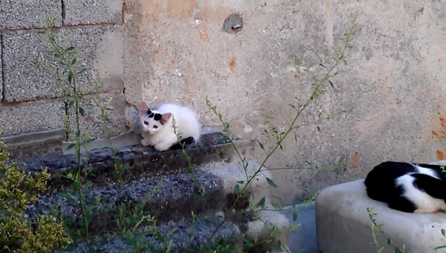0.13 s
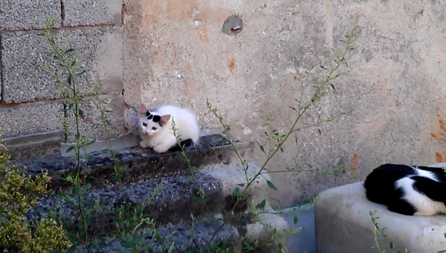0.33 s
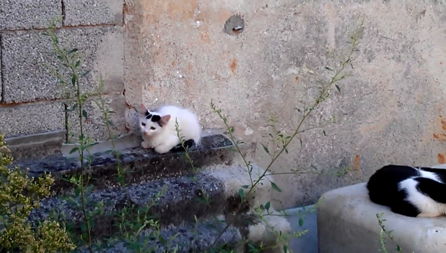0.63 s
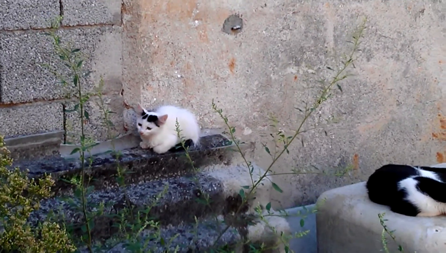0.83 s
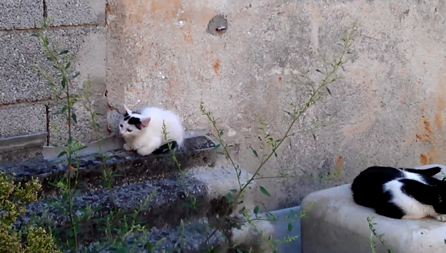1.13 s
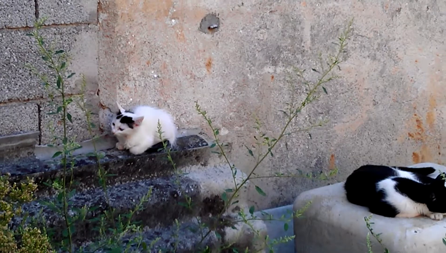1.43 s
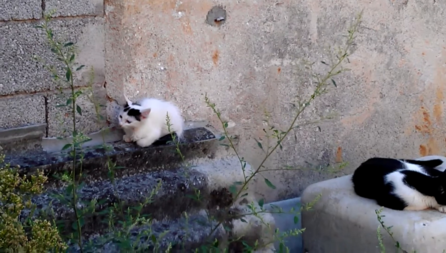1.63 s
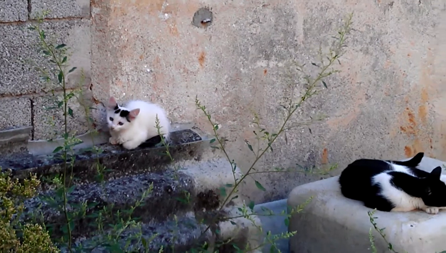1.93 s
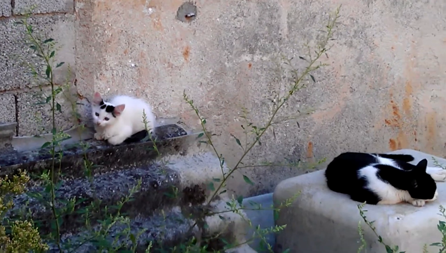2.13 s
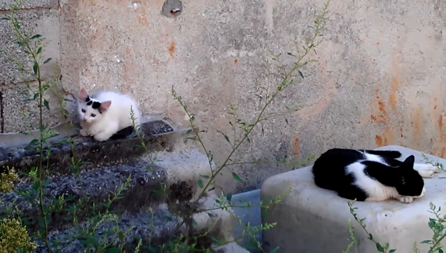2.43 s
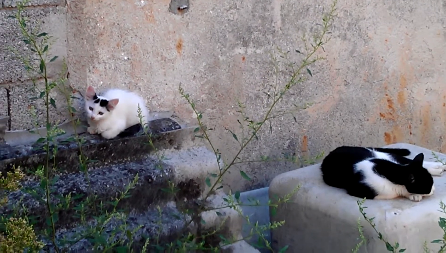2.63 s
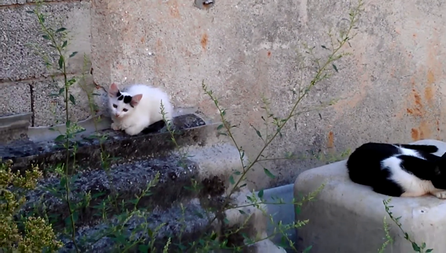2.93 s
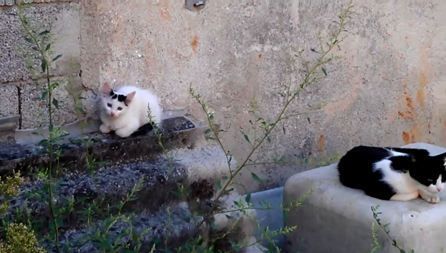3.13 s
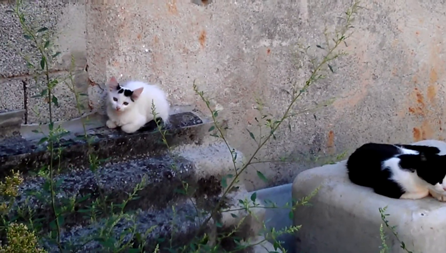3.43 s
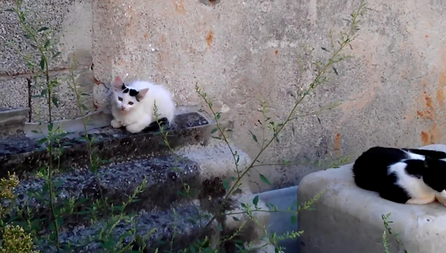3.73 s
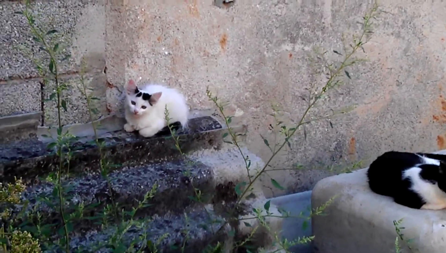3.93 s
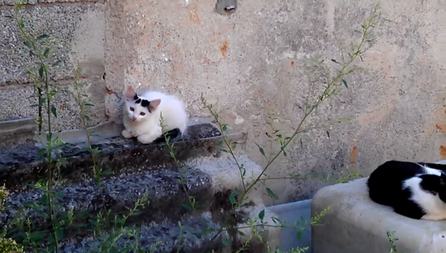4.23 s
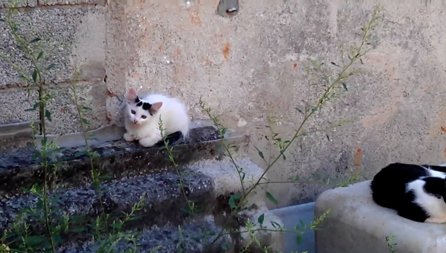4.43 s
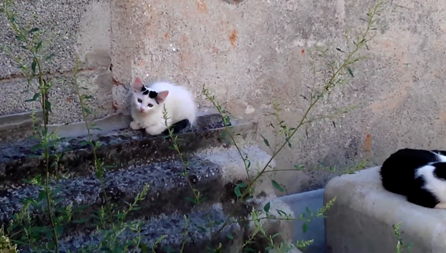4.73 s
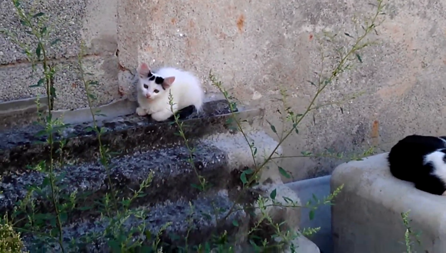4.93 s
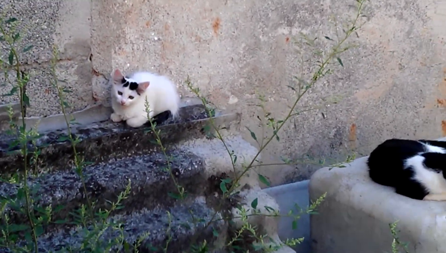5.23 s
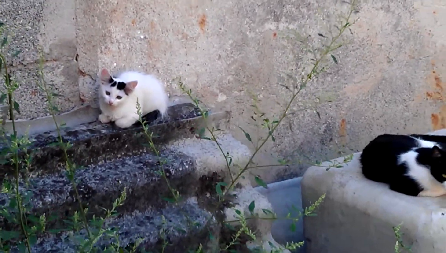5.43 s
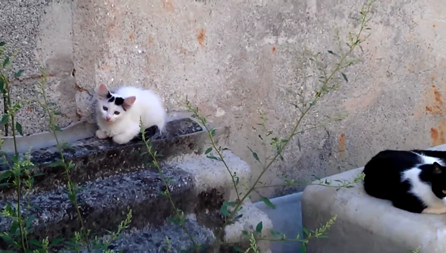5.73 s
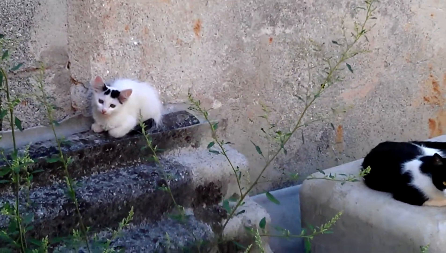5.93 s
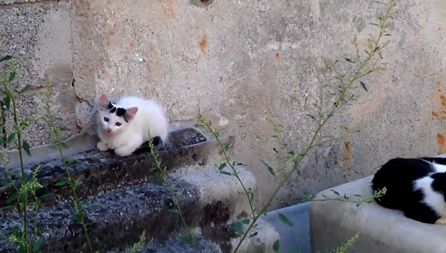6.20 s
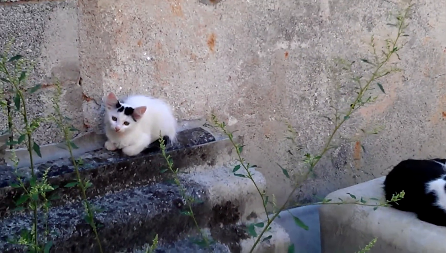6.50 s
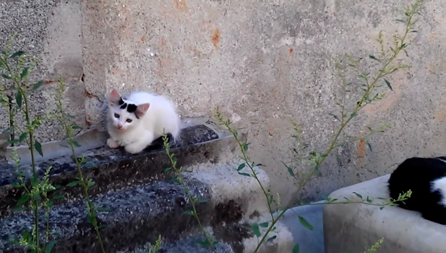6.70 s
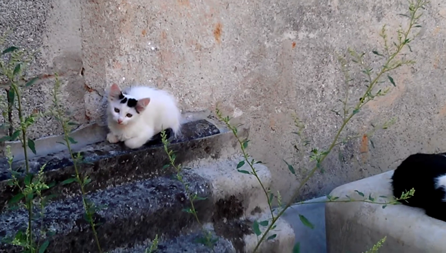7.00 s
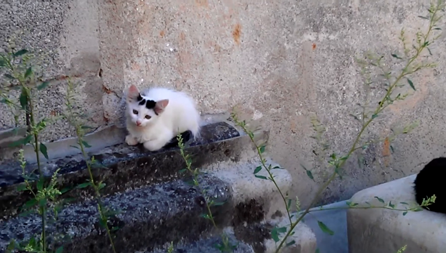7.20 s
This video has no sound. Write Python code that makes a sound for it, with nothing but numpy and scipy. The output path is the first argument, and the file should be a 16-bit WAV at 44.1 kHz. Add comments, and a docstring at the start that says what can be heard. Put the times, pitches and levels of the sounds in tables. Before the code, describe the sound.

Throughout, a distant four-cylinder engine runs at steady speed, about eleven uneven cycles a second, with low ringing exhaust beats, blurred mechanical clatter reflected by yard walls, and a thin wavering fan tone near 1.2 kHz. Until about 2 s it booms deeply; by 5.5 s it has become drier and more rattly, growing slightly louder toward the end. Faint brushing starts near 2.5 s, then at 2.9 s a loud burst of soft hollow slaps and clicks hits the camera body, with rough, partly singing rubbing fading by 3.5 s. A much lighter brush comes at 4.5-4.9 s. Faint clicks occur around 5.35 s, two sharper ones at 5.7 s, and one very loud dry snap at 6.56 s. From 7.13 s a brief grainy finger scrape mixes with a flurry of plastic clicks, the last around 7.3 s.

```python
"""Far engine in a yard, close handling

A four-cylinder engine some way off: ringing exhaust beats, clatter carried between yard walls, a faint fan tone.
Close to the microphones, soft material slaps the camera body and brushes hard across it, then again
more lightly: shaped friction noise, short rings and narrow-band rubs.
The grip shifts: resonant clicks on the plastic case, faint slides, and a brief finger scrape in noise."""
import sys
import numpy as np
from scipy.fft import rfft, irfft, next_fast_len
from scipy.io import wavfile
from scipy.ndimage import map_coordinates

SR = 44100
rng = np.random.default_rng(int(sys.argv[2]) if len(sys.argv) > 2 else 0)


def put_to_file(sound):
    """Save the sound as 16-bit audio at rate SR, in the file named by the first command-line argument."""
    columns = np.atleast_2d(sound).T  # one column per channel
    safe = np.clip(columns, -1, 1)
    whole_steps = np.round(safe * 32767)
    wavfile.write(sys.argv[1], SR, whole_steps.astype(np.int16))


N = 324576
TIME = np.arange(N) / SR  # s


def amp(db):
    """Decibels to gain."""
    return 10 ** (np.asarray(db) / 20)


def unit(x):
    """Scale to rms 1."""
    return x / np.sqrt(np.mean(x ** 2) + 1e-20)


def along(points, hz):
    """Read (frequency, value) points on a log frequency axis."""
    f, v = np.transpose(points)
    return np.interp(np.log(hz + 1), np.log(f + 1), v)


def shape(points):
    """A (frequency [Hz], level [dB]) spectrum as a response."""
    return lambda hz: amp(along(points, hz))


def wobble(rate):
    """A smooth random curve through rate knots a second."""
    knots = rng.standard_normal(int(N * rate / SR) + 4)
    return map_coordinates(knots, [TIME * rate])


def filtered(x, response):
    """Multiply the spectrum of x by a response of frequency."""
    n = x.shape[-1]
    padded = next_fast_len(n + 8192)
    spectrum = rfft(x, padded) * response(np.fft.rfftfreq(padded, 1 / SR))
    return irfft(spectrum, padded)[..., :n]


def resonances(modes, f, alternate=True):
    """Causal response of (Hz, width Hz, dB) modes; with like signs they leave notches between them."""
    total = 0
    for k, (centre, width, db) in enumerate(modes):
        sign = (-1) ** (k * alternate)
        damping = 1j * f * width
        total = total + sign * amp(db) * damping / (centre * centre - f * f + damping)
    return total


def placed(pair, colour, side, pan):
    """Colour two unrelated signals as mid and side, spread them over the two microphones, at rms 1."""
    def mid_side(hz):
        ratio = amp(along(side, hz))
        return colour(hz) * np.array([np.ones_like(hz), ratio]) / np.hypot(1, ratio)

    mid, sides = filtered(pair, mid_side)
    left_right = np.array([mid + sides, mid - sides])
    return unit(filtered(left_right, lambda hz: amp(np.outer([.5, -.5], along(pan, hz)))))


def friction(rate, grain_db):
    """Smooth sliding hiss with tiny slips of uneven size, rate a second."""
    slips = (rng.random(N) < rate / SR) * rng.standard_normal((2, N))
    return rng.standard_normal((2, N)) + amp(grain_db) * unit(slips)


# Far exhaust, the beats of one cycle: (place in cycle [0-1], ring pitch [Hz], mean swell [s],
# mean level while booming [dB], mean level once rattling [dB])
EXHAUST_BEATS = [(-.105, 166.4, 0.00944, -40.5, -66), (-.075, 198, 0.00394, -51, -40.5),
                 (.061, 303.5, 0.00654, -59, -49), (.199, 167.5, 0.0097, -47, -75),
                 (.429, 319.4, 0.003, -54, -51), (.582, 301.1, 0.0061, -51, -50.5),
                 (.625, 191.9, 0.0048, -52, -51), (.787, 264.7, 0.00288, -69.5, -41.5)]
# Clean engine orders: (multiple of the cycle rate, level while booming [dB], level once rattling [dB])
ENGINE_ORDERS = [(8, -80.5, -71), (12, -57.5, -63.5), (13, -65.5, -62.5), (16, -52.5, -80),
                 (19, -69.5, -66.5), (23, -71.5, -59), (27, -69.5, -61.5), (29, -60, -67.5),
                 (50.5, -69, -89), (67.62, -86, -68), (71.8, -65, -79), (98.9, -81, -61.5),
                 (117, -78.5, -60.5)]
# The boom's level dips for a moment: (time [s], level [dB])
BOOM_LEVEL = [(0, 3), (.35, 0.5), (1.1, 0), (1.45, 0), (1.75, -2), (2.1, 0.5)]
RATTLE_DB = -2  # the drier voice at full strength
CHANGE_START_S, CHANGE_S = 2.02, 3.5  # the boom gives way to the rattle
LENGTH_SCATTER, PITCH_SCATTER = 0.163, 0.006  # no two beats ring alike (log length, share of pitch)


def exhaust(cycles):
    """Uneven firings ring the pipe and the yard; the deep boom gives way to a drier rattle."""
    change = np.pi / 2 * np.clip((TIME - CHANGE_START_S) / CHANGE_S, 0, 1)
    boom = amp(np.interp(TIME, *np.transpose(BOOM_LEVEL))) * np.cos(change)
    rattle = amp(RATTLE_DB) * np.sin(change)
    count = np.arange(-1, int(cycles[-1]) + 1)
    t = np.arange(SR // 5) / SR
    out = np.zeros(N + SR)
    for place, hz, swell, boom_db, rattle_db in EXHAUST_BEATS:
        starts = np.interp(count + place, cycles, TIME, -1, -1)
        for s, (size, jitter, length, detune) in zip(starts, rng.standard_normal((len(count), 4))):
            if s > 0:
                age = t / (swell * np.exp(LENGTH_SCATTER * length))
                ring = age * np.exp(1 - age) * np.sin(2 * np.pi * hz * (1 + PITCH_SCATTER * detune) * t)
                i = int(np.clip((s + 0.000157 * jitter) * SR, 0, N - 1))
                level = boom[i] * amp(boom_db) + rattle[i] * amp(rattle_db)
                out[i:i + len(t)] += amp(0.93 * size) * level * ring
    beats = filtered(out[:N], lambda hz: 1 / np.sqrt(1 + (124 / (hz + 1)) ** 20))  # low cut

    angle = 2 * np.pi * (cycles - EXHAUST_BEATS[0][0])  # the hum keeps step with the first listed beat
    hum = np.zeros(N)
    for k, boom_db, rattle_db in ENGINE_ORDERS:
        level = boom * amp(boom_db) + rattle * amp(rattle_db)
        hum += level * amp(1.62 * wobble(5.0)) * np.sin(round(k) * angle)  # whole orders only
    return (beats + hum) * amp([[.4], [-.4]])


# Airborne engine noise across the yard: (frequency [Hz], level [dB])
CLATTER_COLOUR = [(260, -30.5), (450, -9.5), (620, -3.5), (800, 1), (980, 0), (1250, 1.5), (2000, -2.5),
                  (2600, -2), (3000, -9), (4000, -6.5), (5200, -14.5), (8000, -16), (9200, -22),
                  (13000, -20)]
# The engine's covers: (resonance [Hz], width [Hz], level [dB])
COVER_MODES = [(782.9, 24.6, -6), (1087.6, 35, -6.5), (1167, 23.2, -6.5), (1310.3, 40, -6.5),
               (1781.8, 16.5, -2.5), (2613, 87, -5.5)]
# Low engine rumble: (frequency [Hz], level [dB])
RUMBLE_COLOUR = [(20, -16), (55, -19), (108, -23), (140, -2), (220, -1.5), (330, 4.5), (430, -0.5),
                 (520, -6.5), (800, -21), (1500, -56)]
# Spread of sound between the yard walls: (frequency [Hz], side minus mid [dB])
YARD_SPREAD = [(60, -3), (120, 7), (230, -9), (460, 4), (920, 5), (1810, 1), (3580, -0.5), (7070, 0),
               (14000, -4)]
# The two microphones differ in colour: (frequency [Hz], left minus right [dB])
MICROPHONE_BALANCE = [(60, 1), (120, 12), (230, -3), (460, 1), (920, 1), (1810, 1.5), (3580, -1),
                      (7070, -7), (14000, 10.5)]
FIRINGS = 4  # per cycle
CLATTER_DB, RISE_START_S, RISE_DB_PER_S = -44.5, 3.54, 0.78  # common gain holds, then slowly grows


def clatter(cycles):
    """Mechanical noise blurred by distance: part repeats every cycle, part rings the covers."""
    pattern = rng.standard_normal((2, SR // 11))
    repeated = pattern[:, (cycles % 1 * pattern.shape[1]).astype(int)]

    def drive(repeat_db):
        return rng.standard_normal((2, N)) + amp(repeat_db) * repeated

    throb = amp(.5 * np.cos(2 * np.pi * cycles * FIRINGS) + 0.78 * wobble(7))
    wash = placed(drive(repeat_db=-7.5), shape(CLATTER_COLOUR), YARD_SPREAD, MICROPHONE_BALANCE)
    covers = placed(drive(repeat_db=-3.0), lambda hz: resonances(COVER_MODES, hz),
                    [(1000, 0.053)], MICROPHONE_BALANCE)
    rumble = placed(drive(repeat_db=-0.5), shape(RUMBLE_COLOUR), YARD_SPREAD, MICROPHONE_BALANCE)
    level_db = CLATTER_DB + RISE_DB_PER_S * np.maximum(TIME - RISE_START_S, 0)
    throbbing = throb * (amp(0.6243) * wash + amp(-10.0 + 2.02 * wobble(3.058)) * covers)
    return amp(level_db) * (throbbing + amp(-10.0) * rumble)


# The far fan's tone dips a little, then rises: (time [s], mean pitch [Hz], mean level [dB])
FAN_TONE = [(0, 1167, -57.5), (2, 1160, -60), (4.1, 1173, -56), (5.5, 1192, -56.5), (7.3, 1192, -55.5)]
WHINE_WAVER_HZ, WHINE_FLICKER_DB = 5, 3  # scales of the random curves


def whine():
    """A thin wavering fan tone that flickers on its way across the yard."""
    s, hz, db = np.transpose(FAN_TONE)
    pitch = np.interp(TIME, s, hz) + WHINE_WAVER_HZ * (wobble(3) + wobble(30))
    level = amp(np.interp(TIME, s, db) + WHINE_FLICKER_DB * wobble(12))
    return level * np.sin(2 * np.pi * np.cumsum(pitch) / SR) * amp([[.5], [-.5]])


HISS_DB = -60


def hiss():
    """Steady, faint top-end noise of the microphones themselves."""
    colour = shape([(4000, -20.5), (8000, -6.5), (9500, 1.5), (13000, -2)])
    return amp(HISS_DB) * placed(rng.standard_normal((2, N)), colour, YARD_SPREAD, MICROPHONE_BALANCE)


def surge(crest, rise, fall):
    """A rounded crest of height 1 between an exponential rise and fall."""
    t = TIME - crest
    return np.exp(1 - np.hypot(1, t / np.where(t < 0, rise, fall)))


# Pushes against the camera body: (crest time [s], drag level [dB], rise [s], fall [s],
# body over drag [dB], bristle over drag [dB])
BRUSH_PUSHES = [(2.56, -42, 0.058, 0.111, -11.5, -6.5), (2.737, -50.5, .025, 0.0217, -11.5, 9),
                (2.822, -37.5, 0.0093, 0.058, -3.5, 2.5), (2.914, -9, 0.013, 0.019, -16.5, -11),
                (2.942, -18.5, 0.0042, 0.0179, -20, 8.5), (3.053, -19.5, 0.0614, 0.0423, -12, 3.5),
                (3.23, -30, 0.17, 0.1087, -7.5, 1.5), (3.278, -33, 0.031, 0.0405, -17, -7.5),
                (4.53, -33, 0.0485, 0.0632, -3.5, 2), (4.705, -36.5, 0.062, 0.0894, -5.5, 0),
                (4.8, -40, 0.0147, 0.055, 5.5, -11)]
# Hollow body under the brushing: (frequency [Hz], level [dB])
BODY_COLOUR = [(30, -43.5), (100, -30.5), (150, -13), (195, 4), (260, -9.5), (365, 2.5), (450, -4.5),
               (600, -13), (1000, -60)]
# Dragging material: (frequency [Hz], level [dB])
DRAG_COLOUR = [(100, -80), (400, -16.5), (560, -19.5), (680, -5.5), (800, 0), (1150, -2), (1550, -4),
               (2200, -10.5), (2900, -39), (6000, -60)]
# Bristling top of the brushing: (frequency [Hz], level [dB])
BRISTLE_COLOUR = [(150, -69), (800, -14.5), (1600, -0.5), (2350, 0), (2900, -9), (4100, -2.5),
                  (5200, -12.5), (6700, -16.5), (8100, -13.5), (9200, -27.5), (12000, -28), (14000, -73)]
# Spread at close range: (frequency [Hz], side minus mid [dB])
BRUSH_SPREAD = [(60, 7.5), (150, -30), (370, 0.5), (920, -1.5), (2270, -4.5), (5630, -2), (14000, 0)]
# Balance over the microphones: (frequency [Hz], left minus right [dB])
BRUSH_BALANCE = [(60, 10), (150, 1), (370, 0.5), (920, 2.5), (2270, -1.5), (5630, -7), (14000, -3)]


def brushing():
    """Soft material drags over the case in overlapping pushes, each with its own share of body and bristle."""
    power = np.zeros((3, N))
    for s, db, rise, fall, body_db, bristle_db in BRUSH_PUSHES:
        gains = amp(db + np.array([body_db, 0, bristle_db]))
        power += np.outer(gains, surge(s, rise, fall)) ** 2
    catch = unit(amp(0.73 * wobble(170) + 0.35 * wobble(21.797)))  # the contact catches and lets go
    out = np.zeros((2, N))
    for gain, colour in zip(np.sqrt(power), (BODY_COLOUR, DRAG_COLOUR, BRISTLE_COLOUR)):
        rub = friction(rate=900, grain_db=-4.5)
        out += gain * placed(rub, shape(colour), BRUSH_SPREAD, BRUSH_BALANCE)
    return catch * out


# The grip slides faintly, close by: (crest time [s], level [dB], Gaussian length [s])
GRIP_SLIDES = [(2.724, -47, 0.11), (4.539, -43, 0.101), (4.771, -46.5, 0.0484), (4.868, -42.5, 0.027),
               (4.974, -44, 0.056), (5.2, -45.5, 0.026), (6.8, -43, 0.031)]
# Scraping skin: (frequency [Hz], level [dB])
SKIN_COLOUR = [(1180, -45.5), (2000, -26), (2510, -12), (4060, -4.5), (4410, 3), (5230, -11), (7980, -7.5),
               (9240, -15.5), (12000, -7.5), (14000, -19.5)]
SCRAPE_S, SCRAPE_DB = 7.134, -29.5  # start and gain of the scrape
SCRAPE_ATTACK_S, SCRAPE_HOLD_S, SCRAPE_RELEASE_S = 0.0263, 0.0367, 0.053


def finger():
    """Skin slides faintly on the case and once scrapes across it, as grainy friction noise."""
    faint = sum(amp(db) * np.exp(-.5 * ((TIME - s) / length) ** 2) for s, db, length in GRIP_SLIDES)
    slide_colour = shape([(1500, -15), (4200, 2.5), (6000, -7), (8000, 2.5), (9500, -4.5), (13000, -3.5)])
    slide = placed(friction(rate=310, grain_db=-6), slide_colour, [(1000, -2.2)], [(1000, 0)])
    rough = friction(rate=3500, grain_db=-3) * amp(1.62 * wobble(250))
    scrape = placed(rough, shape(SKIN_COLOUR), [(1000, -3.0)], [(4000, -1.5), (14000, 1)])
    corners = SCRAPE_S + np.cumsum([0, SCRAPE_ATTACK_S, SCRAPE_HOLD_S, SCRAPE_RELEASE_S])
    press = np.interp(TIME, corners, [0, 1, 1, 0])
    return faint * slide + amp(SCRAPE_DB) * press * scrape


# Soft material slaps the case: (start time [s], level [dB], ring pitch [Hz])
SLAPS = [(2.9074, -1.5, 1200), (2.912, -6.5, 1100), (2.9165, -6.5, 1142), (2.9234, -6.5, 1195),
         (2.9305, -3.5, 1030), (2.9391, -8, 1018)]
THUMP_SWELL_S = 0.001146


def thumps():
    """A quick run of soft, hollow slaps: short swelling rings, nearly alike at both microphones."""
    out = np.zeros((2, N + SR))
    t = np.arange(SR // 20) / SR
    age = t / THUMP_SWELL_S
    for s, db, hz in SLAPS:
        ring = np.sin(2 * np.pi * hz * (t + np.array([[.00007], [0]])))  # one microphone is nearer
        out[:, round(s * SR):][:, :len(t)] += amp(db) * age * np.exp(1 - age) * ring
    return out[:, :N] * amp([[.6], [-.6]])


# Snaps at the grip: (start time [s], level [dB], left minus right [dB], colour centre [Hz],
# colour width [octaves], scuff level against the click [dB], scuff fall by 60 dB [s])
CASE_CLICKS = [(2.9364, -9.5, -4, 4200, 0.49, -21.5, 0.054), (2.9418, -14, -5.5, 4100, 0.41, -23, .05),
               (5.3499, -27.5, 0, 1410, 0.76, -14.5, 0.104), (5.3687, -25.5, -5.5, 1500, 0.86, -15, 0.18),
               (5.374, -33, -2, 6300, 0.76, -17, .02), (5.4025, -33.5, -5, 1500, 0.95, -9.5, 0.079),
               (5.7136, -11, 4.5, 13000, 0.85, -12.5, 0.0375), (5.7188, -10.5, -3, 8600, 1.5, -20.5, 0.158),
               (5.771, -32.5, 1, 5000, 0.5, -8, 0.175), (5.925, -30.5, 0, 4500, 0.73, -20, .03),
               (6.5615, 1, -5, 4830, 0.813, -33, 0.027), (6.5616, -36.5, -1, 307, 0.293, -16, 0.033),
               (7.129, -29.5, -2, 4800, .9, -5, 0.046), (7.16, -21.5, 0, 4500, 1, -17.5, 0.021),
               (7.1757, -13.5, 6, 10900, 0.95, -21.5, .02), (7.1849, -19, -3.5, 4500, 0.66, -16, .02),
               (7.2012, -22.5, 1, 4600, 0.29, -17, .02), (7.2117, -14, 0, 4330, 0.51, -23, 0.022),
               (7.2302, -26.5, -1, 4600, 0.31, -11.5, .025), (7.3224, -13.5, 1, 2500, 1.78, -15.5, 0.096)]
# The plastic case: (resonance [Hz], width [Hz], level [dB])
CASE_MODES = [(2083, 343, 7.5), (3777, 810, 0.5), (4856, 272, -2.5), (6250, 790, -19.5), (7990, 490, 5),
              (9730, 550, -12.5)]
# Its dull, unpitched response: (frequency [Hz], level [dB])
SHELL_COLOUR = [(40, -65), (100, -35.5), (350, -6), (1250, -5), (2800, -25), (6300, -16), (13000, -10)]


def clicks():
    """Each snap rings the case for a few milliseconds and trails a short scuff."""
    out = np.zeros((2, N + SR))
    size = 8192
    t, hz = np.arange(size) / SR, np.fft.rfftfreq(size, 1 / SR)
    case = abs(resonances(CASE_MODES, hz, alternate=False)) + amp(along(SHELL_COLOUR, hz))
    for s, db, pan_db, centre_hz, octaves, scuff_db, t60 in CASE_CLICKS:
        colour = case / (1 + (np.log2((hz + 1) / centre_hz) / octaves) ** 2)
        # folding the cepstrum gives minimum phase: the snap starts at once
        cepstrum = irfft(np.log(colour + 1e-5))
        cepstrum[1:size // 2] *= 2
        cepstrum[size // 2:] = 0
        snap = irfft(np.exp(rfft(cepstrum)))
        grit = unit(irfft(rfft(rng.standard_normal((2, size))) * colour ** 0.516))
        scuff = grit * (amp(-15.0 - 60 * t / 0.0108) + amp(scuff_db - 60 * t / t60))
        late_left = np.pad(snap, (2, 0))[:size]  # one microphone is nearer
        snaps = np.array([late_left, snap]) / abs(snap).max()
        gains = amp(db + pan_db * np.array([[.5], [-.5]]))
        out[:, round(s * SR):][:, :size] += gains * (snaps + scuff)

    def balance_and_low_cut(hz):
        balance = amp(np.outer([.5, -.5], along(MICROPHONE_BALANCE, hz)))
        return balance / np.sqrt(1 + (200 / (hz + 1)) ** 8)

    return filtered(out[:, :N], balance_and_low_cut)


# Rubbing that sings, close by: (crest time [s], level [dB], Gaussian length [s], pitch at crest [Hz],
# fuzz rate, about the bandwidth [Hz], glide [octaves/s])
SINGING_RUBS = [(3.043, -28.5, 0.091, 1128, 200.2, 0), (3.277, -31.5, 0.0417, 1720, 329.9, -0.14),
                (3.411, -44.5, 0.055, 822, 130.2, 0), (4.711, -42.5, .035, 2096, 159.2, 0),
                (4.85, -42.5, .06, 245.2, 90.11, -3)]


def rubs():
    """Where the material grips, its slips gather around one fuzzy pitch that may sink as it slows."""
    out = np.zeros((2, N))
    for s, db, length, hz, width_hz, glide in SINGING_RUBS:
        t = TIME - s
        pitch = hz * 2 ** (glide * np.clip(t, -2 * length, 2 * length))
        phase = 2 * np.pi * np.cumsum(pitch) / SR
        fuzz = unit(wobble(width_hz) * np.cos(phase) + wobble(width_hz) * np.sin(phase))
        out += amp(db) * np.exp(-.5 * (t / length) ** 2) * fuzz
    return out


CYCLE_HZ, FIRST_BEAT_S = 11.0, .057  # mean engine cycle rate, time of cycle zero
WANDER_CYCLES, WANDER_PER_S = .025, 1.5  # the engine holds its speed, straying only slightly


def scene():
    """The far engine under the close handling sounds."""
    cycles = CYCLE_HZ * (TIME - FIRST_BEAT_S) + WANDER_CYCLES * wobble(WANDER_PER_S)
    engine = exhaust(cycles) + clatter(cycles) + whine()
    handling = brushing() + finger() + thumps() + clicks() + rubs()
    return engine + hiss() + handling


TOP_HZ = 14200  # upper band limit


def record(dry):
    """The loudest peaks are rounded off; the microphone drops deep bass and keeps nothing above its band limit."""
    rounded = dry / (1 + abs(dry) ** 6) ** (1 / 6)
    return filtered(rounded, lambda hz: (hz < TOP_HZ) / np.sqrt(1 + (66 / (hz + 1)) ** 10))


dry = scene()
out = record(dry)
put_to_file(out)
```